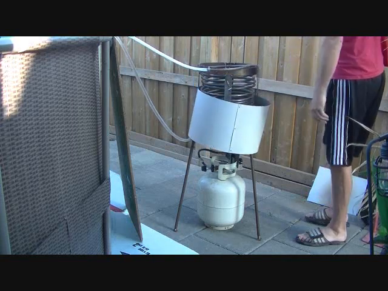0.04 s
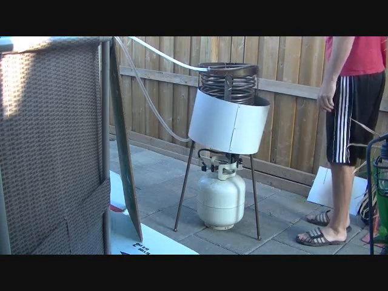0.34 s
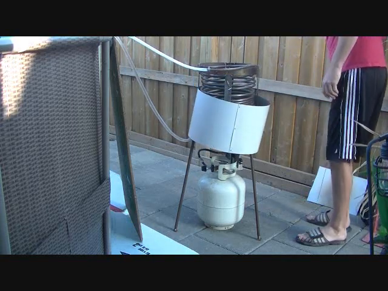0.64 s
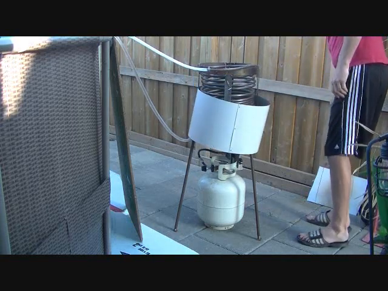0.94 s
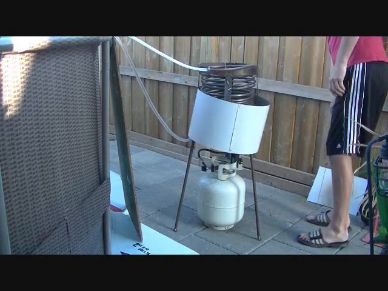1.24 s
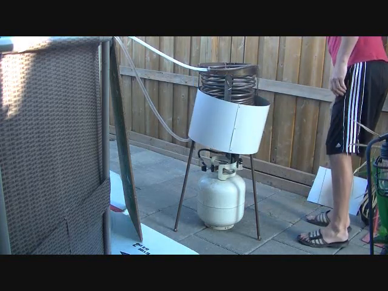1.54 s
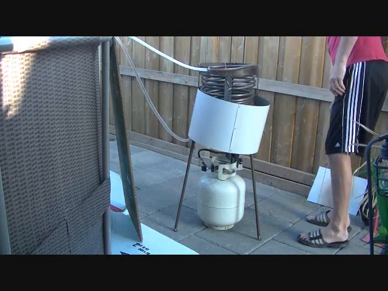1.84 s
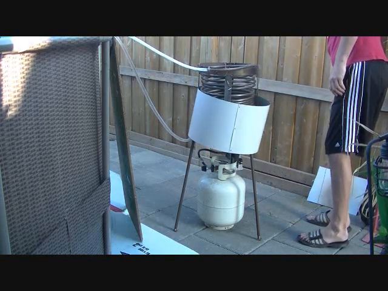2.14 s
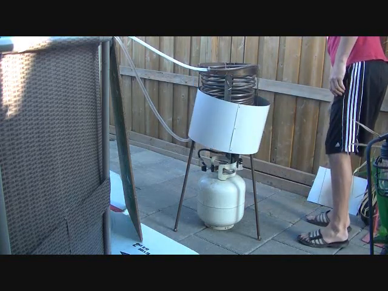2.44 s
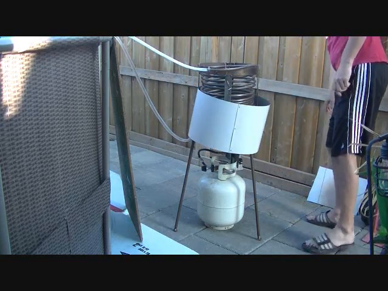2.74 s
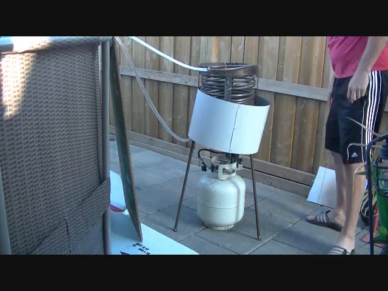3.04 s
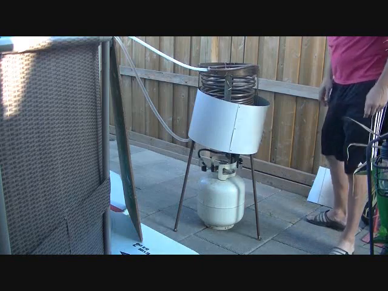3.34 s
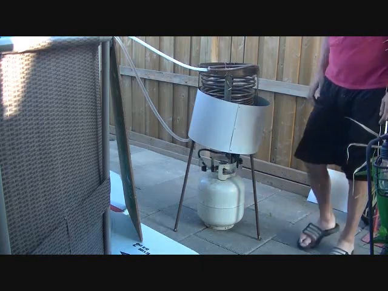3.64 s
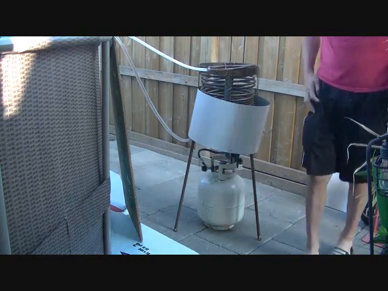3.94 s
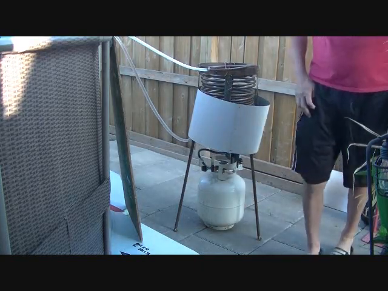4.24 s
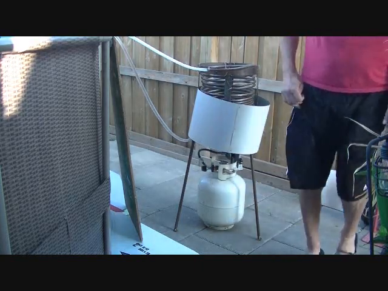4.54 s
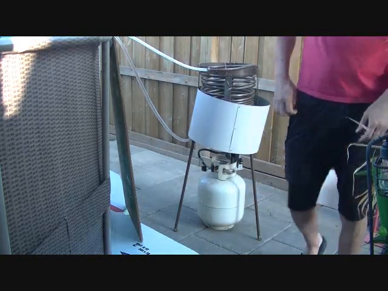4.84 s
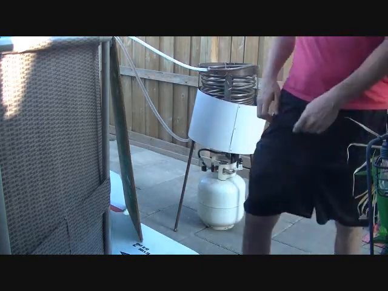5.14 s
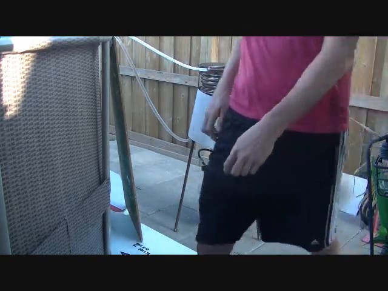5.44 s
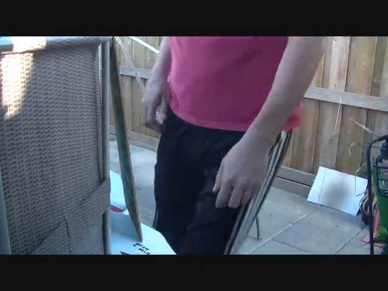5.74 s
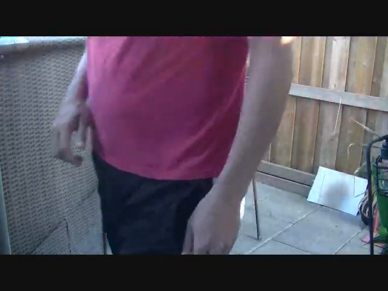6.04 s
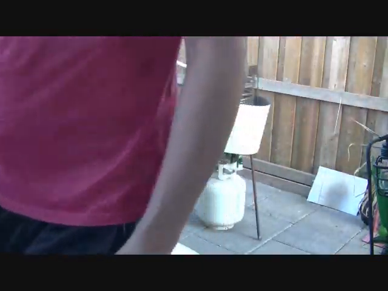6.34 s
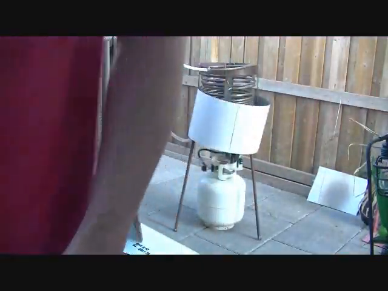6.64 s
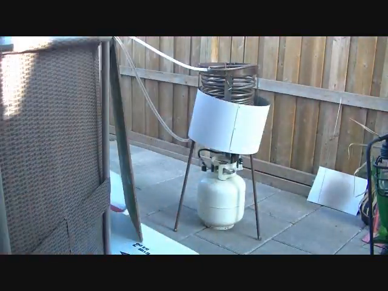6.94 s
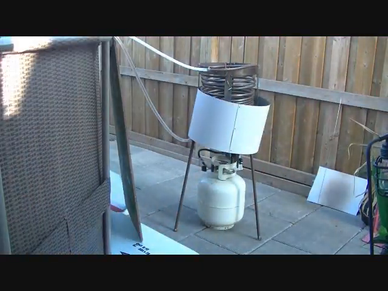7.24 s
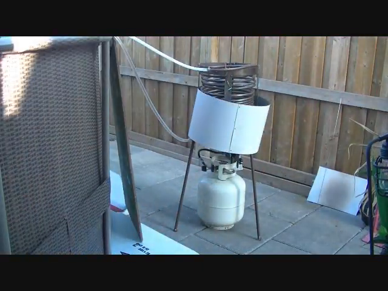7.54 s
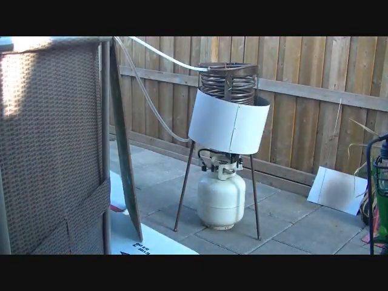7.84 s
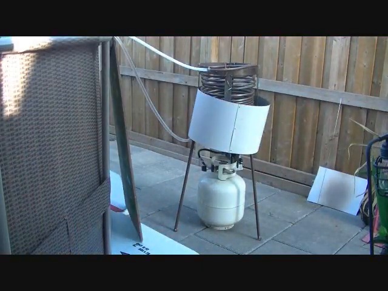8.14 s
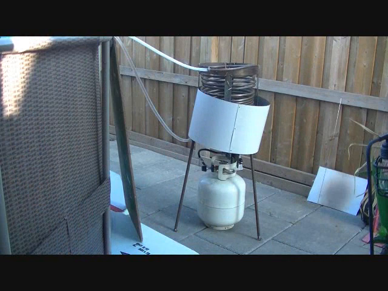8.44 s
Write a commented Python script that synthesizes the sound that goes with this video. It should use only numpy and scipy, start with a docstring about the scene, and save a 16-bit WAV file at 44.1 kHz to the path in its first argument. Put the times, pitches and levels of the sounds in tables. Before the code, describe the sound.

Sandals scrape and crackle on sandy pavers a few paces off, then come nearer and pass the microphone, clothing swishing lightly. Close on the left, a lens motor ticks with a faint hum. Low footfalls on hollow boards follow behind the microphone, then one sharp sheet-metal clack and a dull knock. Small birds twitter throughout the quiet yard, with traffic far away.

```python
"""A quiet paved back yard, small birds chirping beyond a wooden fence, traffic far off.
Someone in sandals shuffles on gritty pavers and passes close to the microphone: soles grind,
grains snap, clothes rustle. Right at the microphone the camera's lens motor ticks and hums.
From behind come steps on hollow boards, the clack of a thin metal cover and a dull bump on a panel."""
import sys
import numpy as np
from scipy import signal
from scipy.fft import rfft, irfft, next_fast_len
from scipy.io import wavfile
from scipy.ndimage import map_coordinates

SR = 44100
rng = np.random.default_rng(int(sys.argv[2]) if len(sys.argv) > 2 else 0)


def to_wav(sig):
    """Store sig (one row per channel, or 1-D mono) as 16-bit WAV at the path in sys.argv[1].

    Samples outside -1..1 are clipped; the rate is SR.
    """
    pcm = np.clip(np.atleast_2d(sig), -1, 1) * 32767
    pcm = np.round(pcm).astype(np.int16)
    wavfile.write(sys.argv[1], SR, pcm.T)  # frames by channels


N = 382774

# Sandals dragging on the pavers: t/s, length/s, level/dB (levels are relative within each source)
SCUFFS = [(0.22, 0.031, -55.5), (0.78, 0.29, -58.5), (2.861, 0.056, -56), (3.948, 0.055, -48.5),
          (4.541, 0.044, -53.5), (4.59, 0.074, -50), (4.862, 0.041, -43), (4.924, 0.097, -46.5),
          (5.181, 0.2, -57.5), (5.467, 0.18, -54.5), (6.042, 0.065, -48.5), (6.167, 0.19, -52),
          (6.283, 0.049, -48.5), (7.242, 0.028, -49.5), (7.906, 0.094, -50), (8.643, 0.08, -53)]
# The loudest grains cracking underfoot: t/s, level/dB, f/Hz
GRAIN_SNAPS = [(0.7847, -29.5, 5940), (0.8745, -21.5, 5430), (0.974, -34.5, 5470), (1.0189, -25, 5360),
               (2.5845, -26.5, 5660), (3.086, -38, 4200), (3.4052, -27, 4200), (4.0972, -28.5, 4650),
               (4.557, -31, 6040), (4.9326, -24.5, 5280), (4.9482, -27, 6420), (4.9616, -26, 4960),
               (4.988, -32, 5200), (5.0307, -18.5, 4760), (5.241, -33.5, 5050), (5.5323, -30, 5220),
               (5.699, -24, 4600), (6.0339, -17.5, 5230), (6.0513, -25.5, 5400), (6.0701, -21.5, 4870),
               (6.085, -38, 5170), (6.117, -25.5, 4470), (6.1804, -23, 5080), (7.246, -32.5, 6600),
               (8.5945, -30, 5760)]
# Clumps of grit collapsing: t/s, level/dB
CRUNCHES = [(3.405, -40), (4.9626, -33), (5.701, -35.5), (6.0508, -40), (6.2913, -37), (6.3057, -32.5),
            (8.562, -39)]
# Strides that swish the clothes: t/s, level/dB
STRIDES = [(3.7, -59.5), (5.15, -58.5), (5.8, -55.5), (6.38, -56), (7.06, -53.5), (7.6, -54.5), (8.17, -55),
           (8.72, -54.5)]

# Runs of the lens motor: start/s, stop/s, hum level/dB, tick level/dB
FOCUS_RUNS = [(3.752, 4.266, -68, -34), (4.788, 5.364, -67, -34.5), (5.821, 7.72, -68, -37.5)]
# Its ticks on starting: delay/s, level/dB re the run's ticks, gain of the low knock
START_TICKS = [(0, -0.5, 0.072), (0.045, -5.5, 1.22), (.113, -9.5, 1.7)]
# Its clearest single ticks: t/s, level/dB
CLEAR_TICKS = [(4.198, -43.5), (6.4, -47), (6.469, -48), (6.566, -45), (8.0841, -43)]

# Footfalls on the boards: t/s, level/dB, rise/s
STEPS = [(5.48, -62, 0.04), (6.168, -53, 0.053), (6.961, -51.5, 0.014), (7.718, -50.5, 0.007),
         (8.516, -45.5, 0.037)]
# Blows behind the microphone: t/s, level/dB
PANEL_BUMPS = [(6.961, -52), (8.5094, -27), (8.565, -49), (8.637, -46)]
COVER_CLACKS = [(7.716, -19.5), (7.7187, -24), (7.7281, -25.5), (7.74, -32), (7.7641, -32)]

# Ringing modes: f/Hz, level/dB, t60/s
LENS_MODES = [(825, -10, 0.019), (1475, 0, 0.025), (1860, 2.5, 0.027), (2660, 6.5, 0.018),
              (3580, 1.5, 0.016)]
CAMERA_BODY_MODES = [(203, -6.5, 0.055), (346, 2.5, 0.015)]
BOARD_MODES = [(61.2, -12, 1.3), (72, -16, 1.3), (92.9, -5, 1.1), (108, 1, 0.19), (162, 1.5, 0.35)]
PANEL_MODES = [(167, 2, 0.13), (220.5, -13, 0.25), (298.5, 5, 0.07), (473, -2.5, 0.036), (995, -13, 0.039),
               (1615, -17, 0.04)]
COVER_MODES = [(300, -2.3, 0.1), (531, 1.5, 0.19), (1666, 1.7, 0.08), (1777, -0.31, 0.12),
               (1940, 0.76, 0.082), (2740, -1, 0.15), (5170, 1, 0.099)]

# Bird calls beyond the fence: t/s, length/s, f/Hz, level/dB, rasp (0-1)
CHEEPS = [(0.324, 0.098, 6870, -58, 0.3), (2.009, 0.057, 4900, -52, 0.18), (3.381, 0.065, 4440, -44, 0.12),
          (4.81, 0.0447, 4100, -37.5, 0.28), (7.848, 0.057, 2910, -50, 0.35)]  # nearer, scooping up
SLURS = [(0.528, .135, 4130, -54, 0.37), (1.04, .12, 4200, -60, 0.3), (1.84, 0.1, 4150, -65, 0.15),
         (2.227, 0.04, 3660, -52.5, 0.26), (3.077, .07, 2820, -55, 0.24), (6.249, 0.05, 3904, -42.5, 0.36),
         (6.347, 0.04, 3750, -47, 0.28)]  # nearer, falling away
CHATTER = [(0.284, .12, 3000, -56, 0.66), (1.028, 0.11, 3210, -53.5, 0.52), (1.423, 0.043, 1395, -63, 0.8),
           (1.624, .14, 5380, -60.5, 0.5), (1.853, 0.14, 2940, -61.5, 0.52), (3.32, 0.17, 3160, -53, 0.83),
           (4.105, .15, 3286, -56.5, 0.76), (6.718, 0.1, 2970, -56.5, 0.47),
           (6.978, 0.16, 4080, -58.5, 0.53), (7.491, 0.16, 5470, -54, 0.37)]  # farther, hoarse
WHISTLES = [(0.735, 0.077, 3930, -64, 0.04), (1.162, .05, 2576, -62, 0.17), (1.27, 0.1, 2660, -62.5, .2),
            (1.969, 0.049, 4500, -56.5, 0.3), (2.442, 0.14, 2860, -60.5, 0.05),
            (2.521, 0.172, 2172, -65.5, 0.36), (3.129, 0.21, 2556, -58.5, 0.24),
            (3.484, 0.1, 4900, -60, 0.05), (6.669, 0.088, 4280, -57.5, .2),
            (6.688, 0.26, 2580, -59.5, 0.37), (7.254, 0.072, 3150, -55.5, 0.1),
            (7.919, 0.26, 2705, -57, .3), (8.514, 0.087, 2993, -50, 0.2)]  # farther, warbling
# Scatters of distant chirps: start/s, stop/s, chirps per second, level/dB
TWITTER = [(0, 8.68, 9, -69), (6.45, 7.3, 18, -61)]
# Call shapes: starting pitch ratio, closing bend ratio, settling rate per note, warble/dB
CHEEP_SHAPE, SLUR_SHAPE = (0.86, 1.0, 4.5, 0.5), (1.17, 0.98, 2.0, 0)
CHATTER_SHAPE, WHISTLE_SHAPE = (1.06, 0.98, 2.2, 0.6), (1.035, 1.04, 4.09, 3.9)

# Noise spectra: f/Hz, level/dB
SAND = [(300, -46), (1200, -19), (2200, -18), (4500, 3.5), (6000, 0.5), (7500, -9), (9500, -10),
        (11000, -34), (15000, -39)]  # bright grinding
RASP = [(60, -35), (250, -2), (900, -12), (1400, 0.5), (2000, 8.5), (3000, 5), (6000, -20)]  # lower rub of any hard contact
FIZZ = [(6000, -33), (8500, 5), (12000, -8), (16000, -10)]  # top octave of a snapping grain
FABRIC = [(500, -10), (1200, -14.5), (2000, -2.5), (3500, -2.5), (5500, 0.5), (7500, -10), (10000, -17.5),
          (15000, -28)]
BOARD_RUMBLE = [(50, -26), (62, 2.5), (110, -2), (170, -22), (330, -17), (700, -28), (2000, -70)]
COVER_CRACK = [(30, -30), (130, 2.5), (420, -0.5), (950, -1.5), (1600, 3.5), (3000, -4), (5500, 5),
               (7500, -6.5), (15000, -40)]
AIR = [(15, -52), (25, 12), (70, -21), (189, 0), (248, 1), (473, -3.5), (604, -10.5), (857, -8),
       (1180, -12), (2890, -7), (5230, -7), (7220, -12.5), (8050, -13), (13800, -19.5), (15800, -23.5)]  # far traffic and hiss
# Stereo width of the air, side over mid: f/Hz, level/dB
AIR_WIDTH = [(60, 6), (200, 3), (380, 5), (700, 1), (1290, 1.5), (2380, 2.5), (4400, -5), (8120, -1),
             (15000, -2)]
# The yard's decay before any stretch: f/Hz, t60/s
YARD_DECAY = [(200, 0.23), (2000, 0.38), (5000, 0.13), (12000, 0.22)]

FIRM_DB, RASP_DB, RASP_GROWTH = -49, -7.5, 0.49  # a firm scuff, its low rasp, extra rasp in dB per dB
GRAINS_PER_S, GRAIN_OVER_DB, GRAIN_HZ = 40, 13, 5000  # small grains cracking within a scuff
NEAREST_S, NEAR_SPAN_S, FAR_FIZZ = 6.06, 0.28, 0.37  # closest pass; share of fizz left farther off
CRUNCH_T60_S, SWISH_HALF_POWER_S = 0.029, 0.22
MOTOR_HZ, HUNT_GAP_S, HUNT_DB, KNOCK_GAIN = 166, 0.07, -47, 0.98
WARBLE_HZ, PITCH_WAVER, OCTAVE_DB = 13.4, 0.00754, -26
HOUSE_ECHO_S, HOUSE_ECHO_DB = 0.058, -17
LOW_CUT_HZ, TOP_HZ = 56, 15830


def sandals():
    """Soles grind over clumps of sand a few paces off, louder and lower with weight on them."""
    out = np.zeros(N)
    for s, length, db in SCUFFS:
        t = clock(length)
        grains = rng.standard_normal(len(t)) * (rng.random(len(t)) < 450 / SR)  # about 450 a second
        crackle = unit(filtered(grains, lambda hz: amp(along(SAND, hz))))
        clumps = amp(3 * wobble(170, len(t)))
        grind = unit((noise(SAND, len(t), grain_db=3) + 0.6 * crackle) * clumps)
        rasp = amp(RASP_DB + RASP_GROWTH * (db - FIRM_DB)) * noise(RASP, len(t), grain_db=7)
        add(out, s, amp(db - 0.5) * swell(t, edge=0.24) * (grind + rasp))
    return yard(out, wet_db=-4) * pan(-1.8)


def small_grains():
    """Each scuff cracks grains at random, louder under a firmer sole: t/s, level/dB, f/Hz."""
    for s, length, db in SCUFFS:
        for _ in range(round(GRAINS_PER_S * length)):
            when = s + length * rng.random()
            yield when, db + GRAIN_OVER_DB + rng.normal(), GRAIN_HZ * np.exp(0.26 * rng.normal())


def grit():
    """A grain snaps in a few cycles and its crumbs crackle after it, brightest by the microphone."""
    out, t = np.zeros(N), clock(0.027)
    age = t / 0.00016  # 1 at the height of the snap
    for s, db, hz in list(GRAIN_SNAPS) + list(small_grains()):
        snap = age * np.exp(1 - age) * np.sin(2 * np.pi * (hz * t + rng.random()))
        crumbs = amp(-11 - 60 * t / 0.018) * noise(SAND, len(t), grain_db=2)
        body = amp(-30 - 60 * t / 0.07) * noise(RASP, len(t))
        nearness = max(np.exp(-((s - NEAREST_S) / NEAR_SPAN_S) ** 2), FAR_FIZZ)
        fizz = nearness * amp(-16 - 60 * t / 0.016) * noise(FIZZ, len(t))
        debris = (crumbs + body + fizz) * attack(t, 0.00032)
        add(out, s + 0.001, amp(db - 1.5) * (snap + debris))
    return yard(highpass(out, hz=1100, order=2), wet_db=-4) * pan(-1.7)


def crunches():
    """Under full weight a clump of grit collapses in a short, low crackle."""
    out, t = np.zeros(N), clock(0.05)
    for s, db in CRUNCHES:
        crackle = noise(RASP, len(t), grain_db=2.5) + amp(-2) * noise(SAND, len(t), grain_db=3.5)
        add(out, s, amp(db - 60 * t / CRUNCH_T60_S) * crackle * attack(t, 0.00071))
    return yard(out, wet_db=-7.5) * pan(-1.3)


def clothes():
    """Fabric swishes with each stride past the microphone."""
    t = np.arange(N) / SR
    power = sum(amp(db) ** 2 / (1 + ((t - s) / SWISH_HALF_POWER_S) ** 4) for s, db in STRIDES)
    rustle = np.sqrt(power) * amp(-1.5 + wobble(18)) * noise(FABRIC, grain_db=1.5)
    return yard(rustle, wet_db=-3.5) * pan(-0.33)


def lens_motor():
    """Dry and close on the left, the motor starts with three fading ticks, then hums and ticks on."""
    out = np.zeros(N)
    ticks = [(s, db, KNOCK_GAIN) for s, db in CLEAR_TICKS]
    for start, stop, hum_db, tick_db in FOCUS_RUNS:
        t = clock(stop - start)
        phase = 2 * np.pi * MOTOR_HZ * t + 0.5 * wobble(14.15, len(t))
        hum = np.sin(phase) + 0.69 * np.sin(2 * phase + wobble(60, len(t)))
        add(out, start, amp(hum_db + 2.1 * wobble(22, len(t))) * hum * swell(t, edge=0.067))
        ticks += [(start + delay, tick_db + db, knock) for delay, db, knock in START_TICKS]
        for s in np.arange(start + 0.17, stop, HUNT_GAP_S):  # hunting for focus
            ticks.append((s + rng.normal(0, 0.015), rng.normal(HUNT_DB, 1.5), KNOCK_GAIN))
    t = clock(0.083)
    for s, db, knock in ticks:
        detune = np.exp(0.06 * rng.normal())
        case = ring(LENS_MODES, detune * t, scatter_db=3)
        body = knock * ring(CAMERA_BODY_MODES, t, scatter_db=2)
        rattle = 0.42 * amp(-60 * t / 0.086) * noise(RASP, len(t))
        add(out, s + 0.001, amp(db - 7) * (case + body + rattle) * attack(t, 0.00047))
    return highpass(out, hz=125, order=4) * pan(7.7)


def metal_cover():
    """Behind the microphone a thin cover clacks and chatters, its ring damped by the hand."""
    out, t = np.zeros(N), clock(0.3)
    decay = 0.65 * amp(-60 * t / 0.004) + 0.089 * amp(-60 * t / 0.18)
    for s, db in COVER_CLACKS:
        crack = decay * noise(COVER_CRACK, len(t))
        sheet = amp(-27) * ring(COVER_MODES, t, scatter_db=1.5)
        add(out, s, amp(db) * (crack + sheet))
    return yard(out, wet_db=-8, stretch=0.55) * pan(-1.3)


def panel_bumps():
    """Soft bumps behind the microphone ring the low modes of a panel."""
    out, t = np.zeros(N), clock(0.9)
    for s, db in PANEL_BUMPS:
        contact = amp(-15.5 - 60 * t / 0.088) * noise(RASP, len(t))
        add(out, s, amp(db) * (ring(PANEL_MODES, t, scatter_db=2) + contact) * attack(t, 0.0028))
    return yard(out, wet_db=-12) * pan(-2.5)


def hollow_steps():
    """Steps behind the microphone set hollow boards booming and rumbling."""
    out, t = np.zeros(N), clock(0.9)
    for s, db, rise in STEPS:
        rumble = amp(-4 - 60 * t / 0.87) * noise(BOARD_RUMBLE, len(t))
        add(out, s, amp(db - 0.5) * (ring(BOARD_MODES, t, scatter_db=2) + rumble) * attack(t, rise))
    return yard(out, wet_db=-12) * pan(-2.5)


def bird_note(length, hz, rasp, start, end, settle, warble_db):
    """A note glides towards its pitch and bends away; a trill and a fast flutter make it hoarse."""
    t = clock(length)
    glide = hz * (1 + (start - 1) * np.exp(-settle * t / length) + (end - 1) * (t / length) ** 2)
    trill = 0.19 * np.sin(2 * np.pi * 300 * t + 0.6 * wobble(40, len(t)))
    jitter = 0.06 * wobble(600, len(t)) + 0.035 * wobble(90, len(t))
    pitch = glide * (1 + rasp * (trill + jitter) + PITCH_WAVER * wobble(58.7, len(t)))
    phase = 2 * np.pi * np.cumsum(pitch) / SR
    tone = np.sin(phase) + amp(OCTAVE_DB) * np.sin(2 * phase)
    warble = amp(warble_db * np.sin(2 * np.pi * WARBLE_HZ * t))
    flutter = amp(5 * rasp * wobble(245, len(t)) + 2 * wobble(45.6, len(t)))
    return unit(tone * warble * flutter * swell(t, edge=0.23))


def birds():
    """Birds call at two distances beyond the fence; the yard and the house echo them."""
    near, far = np.zeros(N), np.zeros(N)
    for track, calls, shape in [(near, CHEEPS, CHEEP_SHAPE), (near, SLURS, SLUR_SHAPE),
                                (far, CHATTER, CHATTER_SHAPE), (far, WHISTLES, WHISTLE_SHAPE)]:
        for s, length, hz, db, rasp in calls:
            add(track, s, amp(db) * bird_note(length, hz, rasp, *shape))
    for start, stop, rate, db in TWITTER:
        for when, height, kind in rng.random((int(rate * (stop - start)), 3)):
            shape = CHEEP_SHAPE if kind < 0.5 else SLUR_SHAPE
            chirp = bird_note(0.06, 2200 + 3000 * height, 0.2, *shape)
            add(far, start + when * (stop - start), amp(db) * chirp)
    out = amp(-2) * yard(near, wet_db=-0.5, stretch=2) + amp(-3) * yard(far, wet_db=1.5, stretch=1.5)
    add(out, HOUSE_ECHO_S, amp(HOUSE_ECHO_DB) * out)
    return out


def air():
    """Far traffic and hiss, wide across the stereo image."""
    mid = noise(AIR)
    side = filtered(noise(AIR), lambda hz: amp(along(AIR_WIDTH, hz)))
    return amp(-58 + 0.097 * wobble(2.17)) * np.array([mid + side, mid - side]) * pan(-1.73)


def whine():
    """A thin electronic whine on the left: two close, wavering tones."""
    t = np.arange(N) / SR
    tones = sum(np.sin(2 * np.pi * hz * t + 0.74 * wobble(23)) for hz in (7852, 7882))
    return amp(-78) * tones * pan(9.5)


def yard(x, wet_db, stretch=1):
    """Paving, fence and house scatter the sound back, differently to each side of the microphone."""
    hz, t, spectra = signal.stft(rng.standard_normal((2, SR)), SR, nperseg=256)
    t60 = stretch * along(YARD_DECAY, hz)[:, None]
    tail = signal.istft(spectra * amp(-60 * t / t60), SR, nperseg=256)[1]
    tail = np.pad(tail / np.linalg.norm(tail[0]), ((0, 0), (SR // 300, 0)))  # arrives 3.3 ms late
    return x + amp(wet_db) * signal.fftconvolve(np.atleast_2d(x), tail, axes=1)[:, :N]


def amp(db):
    return 10 ** (np.asarray(db) / 20)


def unit(x):
    return x / np.sqrt(np.mean(x ** 2) + 1e-20)


def clock(length):
    return np.arange(int(length * SR)) / SR


def along(points, hz):
    """Interpolate rows of f/Hz, value on a log frequency axis."""
    f, values = np.transpose(points)
    return np.interp(np.log(hz + 1), np.log(f + 1), values)


def add(track, s, x):
    """Mix x into the track from time s on."""
    part = track[..., max(round(s * SR), 0):][..., :x.shape[-1]]
    part += x[..., :part.shape[-1]]


def wobble(rate, size=N):
    """A smooth random curve, rate knots a second."""
    knots = rng.standard_normal(int(size * rate / SR) + 4)
    return map_coordinates(knots, [np.arange(size) * rate / SR])


def filtered(x, response):
    """Shape x by a frequency response."""
    n = x.shape[-1]
    padded = next_fast_len(n + SR // 8)
    return irfft(rfft(x, padded) * response(np.fft.rfftfreq(padded, 1 / SR)), padded)[..., :n]


def highpass(x, hz, order):
    return signal.sosfilt(signal.butter(order, hz, "highpass", fs=SR, output="sos"), x)


def noise(spectrum, size=N, grain_db=0):
    """Coloured noise of rms 1; grain_db breaks it into uneven grains."""
    x = rng.standard_normal(size) * amp(grain_db * wobble(900, size))
    return unit(filtered(x, lambda hz: amp(along(spectrum, hz))))


def ring(modes, t, scatter_db):
    """Damped modes, at new strengths for each blow."""
    return sum(amp(db + scatter_db * rng.normal() - 60 * t / t60) * np.sin(2 * np.pi * hz * t)
               for hz, db, t60 in modes)


def attack(t, rise_s):
    return 1 - np.exp(-t / rise_s)


def swell(t, edge):
    """A rounded rise and fall over the whole of t."""
    return np.abs(np.sin(np.pi * t / t[-1])) ** edge


def pan(left_db):
    return amp([[left_db / 2], [-left_db / 2]])


def scene():
    """The yard as heard from the microphone."""
    background = air() + whine() + birds()
    walker = grit() + crunches() + sandals() + clothes()
    return background + walker + lens_motor() + hollow_steps() + panel_bumps() + metal_cover()


def record(dry):
    """Sound reaches the left microphone port first; the camera cuts the deepest bass and the very top."""
    lag_s = np.array([[0], [0.7 / SR]])
    thinned = highpass(dry, LOW_CUT_HZ, order=6)
    return filtered(thinned, lambda hz: (hz < TOP_HZ) * np.exp(-2j * np.pi * hz * lag_s))


dry = scene()
out = record(dry)
to_wav(out)
```